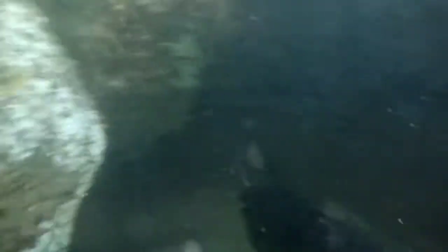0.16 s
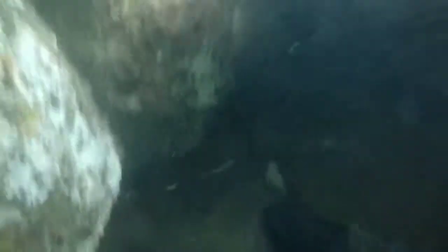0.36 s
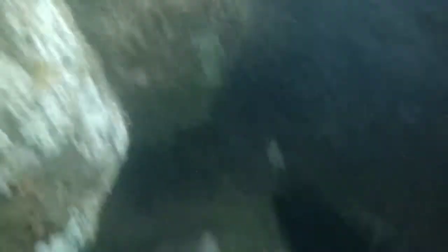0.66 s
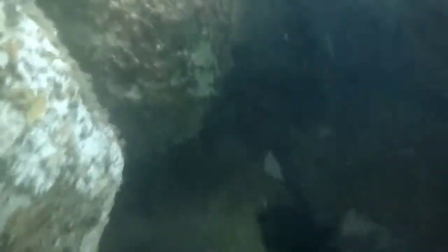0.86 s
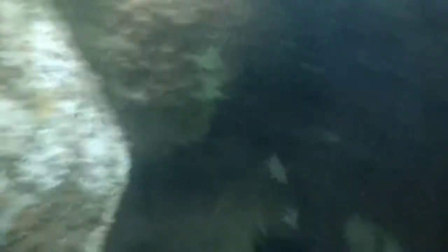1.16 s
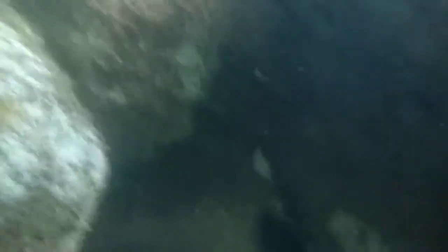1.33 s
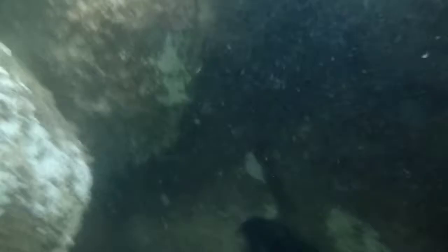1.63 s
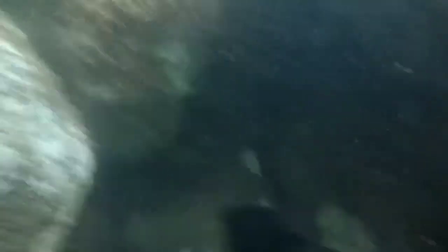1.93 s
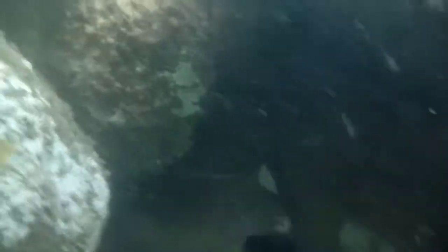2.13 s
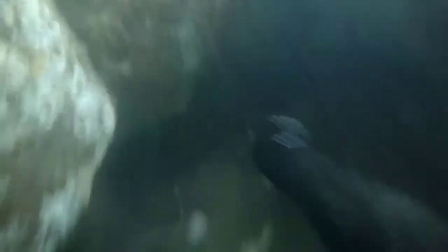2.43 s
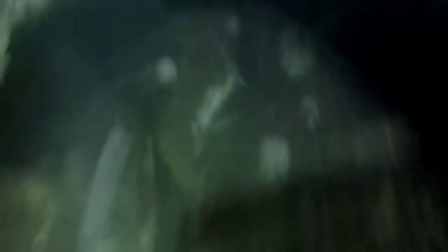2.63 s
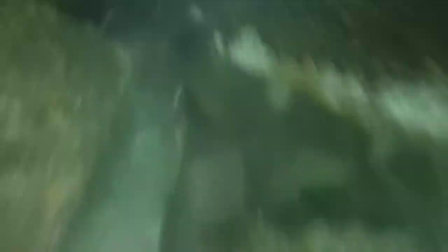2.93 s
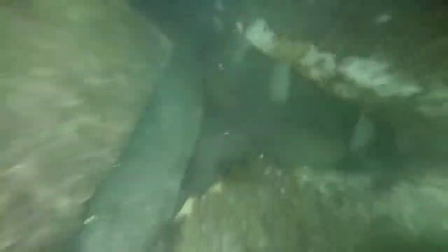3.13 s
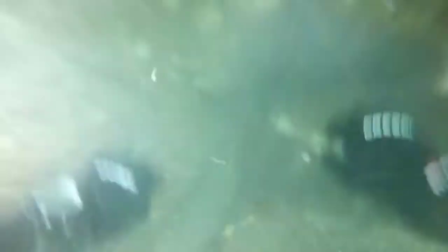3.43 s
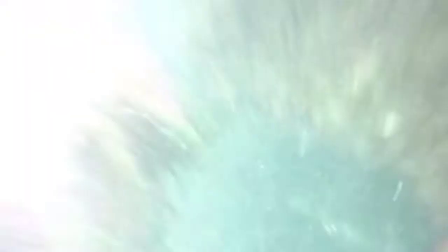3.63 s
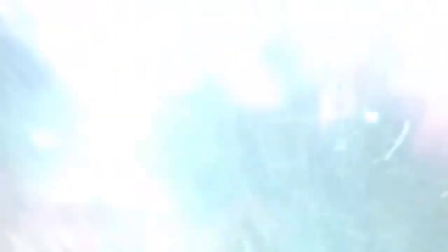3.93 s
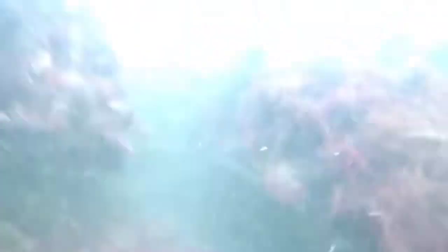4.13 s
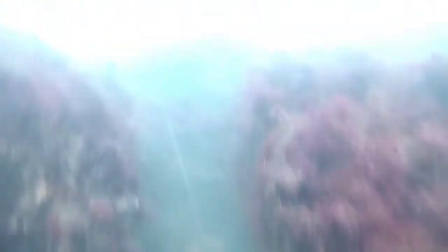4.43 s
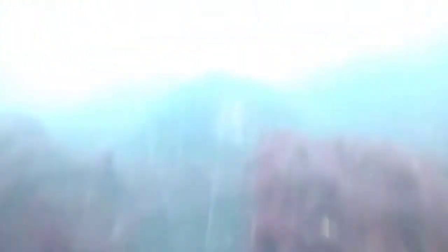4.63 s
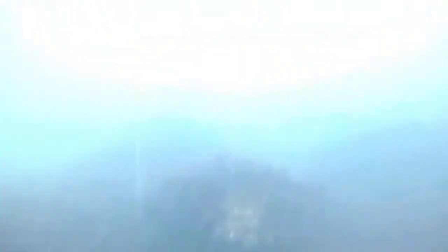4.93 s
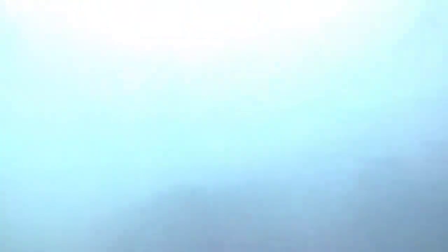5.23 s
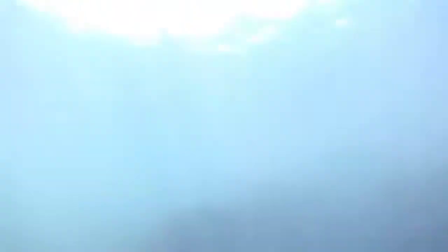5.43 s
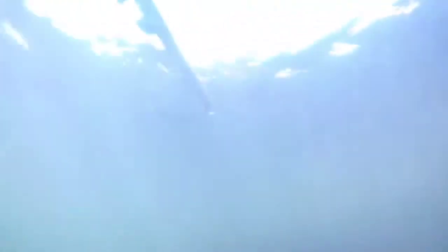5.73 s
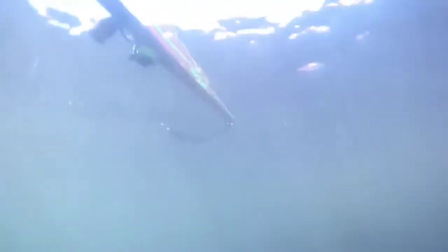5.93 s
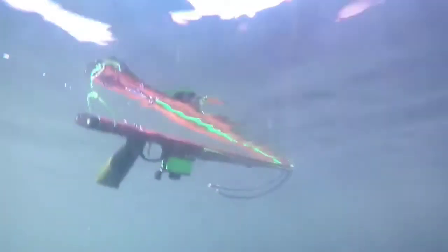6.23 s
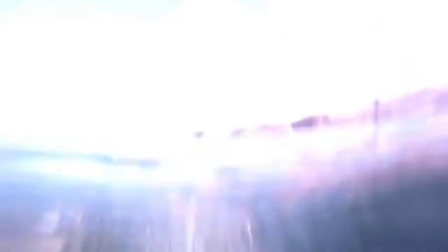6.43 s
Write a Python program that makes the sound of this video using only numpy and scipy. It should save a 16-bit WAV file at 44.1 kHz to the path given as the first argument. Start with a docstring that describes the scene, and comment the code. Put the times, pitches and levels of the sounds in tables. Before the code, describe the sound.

Muffled deep underwater surging and hollow knocks on a sealed camera housing, with gritty rubs and ticks, ending in a gurgle at the surface.

```python
"""Deep surging and sharp knocks, with rubs, ticks and wobbles, end in a gurgle: a camera in a sealed housing
is carried among rocks under water and brought up to the surface. Surge and wash are filtered noise; knocks are
damped sines with cracks; rubs, fizz and swishes are random grit ringing shell modes; wobbles, perhaps trapped
air, are gliding sines; bubbles are short resonances. Two wide channels merge into one after two seconds."""
import sys
import numpy as np
from scipy import signal
from scipy.fft import rfft, irfft
from scipy.io import wavfile
from scipy.ndimage import uniform_filter1d, minimum_filter1d

SR = 44100
rng = np.random.default_rng(int(sys.argv[2]) if len(sys.argv) > 2 else 0)


def log_audio(samples):
    """Write samples as a 16-bit WAV file to the path given in sys.argv[1]."""
    # one column per channel
    frames = np.atleast_2d(samples).T
    # limit to full scale, then quantise
    limited = np.clip(frames, -1, 1)
    pcm = np.round(limited * 32767).astype(np.int16)
    wavfile.write(sys.argv[1], SR, pcm)


N = 289276

# strength of the water surging on the shell: (time [s], level [dB])
SURGE_LEVEL = [(0.0, -19.5), (1.24, -18.5), (1.46, -19.5), (1.64, -28.5), (1.72, -17), (2.25, -20.5),
               (2.32, -24.5), (2.6, -15), (2.66, -21.5), (3.3, -26.5), (3.54, -14), (3.71, -26),
               (4.13, -16), (4.24, -27.5), (4.4, -16.5), (5.33, -19), (6.1, -14.5), (6.2, -21), (6.56, -15)]
# knocks inside the housing: (time [s], ring level [dB], ring pitch [Hz], crack relative to ring [dB])
KNOCK_EVENTS = [(0.015, -7.5, 446, -1), (0.112, -11.5, 476, -4), (0.167, -26.5, 407, 2.5),
                (0.216, -20, 352, -42), (0.308, -8, 371, -15.5), (0.319, -12, 360, -10.5),
                (0.376, -13, 416, -4.5), (0.516, -13, 330, -38), (0.571, -8, 464, -7), (0.64, -13, 411, 5),
                (0.654, -15.5, 510, -22), (0.697, -14.5, 403, -1), (0.774, -9.5, 449, -6.5),
                (0.791, -10.5, 375, -13), (0.848, -11, 402, -9), (0.935, -7.5, 362, -6),
                (1.194, -5.5, 423, -4), (1.298, -8, 484, -4), (1.34, -16.5, 392, 1.5),
                (1.409, -11.5, 375, -17), (1.425, -11, 495, -4.5), (1.441, -7.5, 367, -16),
                (1.485, -15.5, 392, 6), (1.549, -17, 340, -40), (1.675, -19.5, 345, 1),
                (1.748, -8, 346, -11), (1.802, -14.5, 495, 2.5), (1.925, -10, 480, -7),
                (1.96, -20, 409, -8), (2.033, -15.5, 487, -4), (2.049, -10, 530, -48),
                (2.222, -25.5, 523, -29), (2.516, -22, 580, -25), (2.548, -8, 548, -3),
                (2.562, -9.5, 571, 0), (2.605, -6, 406, -5.5), (2.687, -10.5, 510, -34),
                (2.936, -4.5, 530, -8), (3.069, -10, 517, -13), (3.252, -38, 604, -30),
                (3.531, -6, 477, 12.5), (3.969, -9, 569, -6), (3.981, -7, 494, -21), (3.99, -20, 430, -5),
                (4.024, -15, 554, 2.5), (4.083, -4, 528.5, -13), (4.122, -9, 558, -12.5),
                (4.411, -17.5, 550, 0), (4.449, -20.5, 504, -1), (4.521, -8, 519, -33),
                (4.563, -10.5, 395, -3.5), (4.712, -18, 542, -30), (4.796, -10, 398, -11),
                (4.872, -21.5, 532, -0.5), (4.89, -18.5, 438, -30), (4.988, -10, 380, 0.5),
                (5.045, -5, 456, -9.5), (5.236, -9, 473, -14), (5.306, -4.5, 498, -16),
                (5.357, -10.5, 500, -16.5), (5.475, -16, 388, -8), (5.498, -24, 562, 7.5),
                (5.655, -7, 613, 9), (5.874, -18.5, 438, -21), (5.967, 3, 527, -49), (6.048, -23, 450, -32),
                (6.102, 0.5, 355, -22)]
# rubbing strokes on the shell that swell and fade: (time of the peak [s], level [dB])
STROKE_EVENTS = [(0.404, -28.5), (0.458, -26.5), (0.632, -25.5), (0.932, -30.5), (1.146, -25.5),
                 (1.358, -36.5), (1.503, -28.5), (1.695, -35.5), (1.915, -36)]
# air leaving at the surface: (time [s], pockets [dB], bubbles [dB], fizz [dB])
AIR_LEVELS = [(6.0, -53.5, -70, -45.5), (6.11, -11.5, -36, -47.5), (6.2, -12.5, -49, -54),
              (6.56, -20.5, -32.5, -42)]
ESCAPE_S = AIR_LEVELS[0][0]


def amp(db):
    """Decibels to linear gain."""
    return 10 ** (np.asarray(db) / 20)


def rms_one(x):
    """Scale to an rms of 1."""
    return x / np.sqrt(np.mean(x ** 2) + 1e-20)


def in_time(rows):
    """Columns of a table, joined by straight lines, at every sample."""
    s, *columns = np.transpose(rows)
    return [np.interp(np.arange(N) / SR, s, c) for c in columns]


def colour(x, points, turn=1):
    """Shape by a (Hz, dB) spectrum, straight over log frequency; turn rotates the phase."""
    hz, db = np.transpose(points)
    f = np.arange(N // 2 + 1) * SR / N + 1
    gain = amp(np.interp(np.log(f), np.log(hz), db))
    return irfft(rfft(x) * gain * turn, N)


def band(x, low_hz, high_hz):
    """Gentle band-pass."""
    return signal.sosfilt(signal.butter(2, [low_hz, high_hz], "band", fs=SR, output="sos"), x)


def even(x, window_s, share):
    """Take part of the chance swell out of a noise; rms 1."""
    level = np.sqrt(uniform_filter1d(x ** 2, int(window_s * SR)) + 1e-12)
    return rms_one(x / level ** share)


def flicker(rate):
    """Random knots of spread 1, rate per second, joined by lines; the 400th is held to the end."""
    knots = rng.standard_normal(400)
    return np.interp(np.arange(N) / SR * rate, np.arange(400), knots)


def resonance(x, hz, width_hz):
    """One ringing mode: a narrower width rings longer."""
    r = np.exp(-np.pi * width_hz / SR)
    zeros = [(1 - r * r) / 2, 0, (r * r - 1) / 2]
    poles = [1, -2 * r * np.cos(2 * np.pi * hz / SR), r * r]
    return signal.lfilter(zeros, poles, x)


def shell(x, widen, patchy_db, shift=1):
    """The shell's modes in parallel, each swelling and sinking on its own as the contact moves."""
    # modes before shift and widening: (pitch [Hz], width [Hz], mean level [dB])
    modes = [(1400, 750, -2), (2026, 79, 15), (2710, 190, -1), (3410, 710, -5), (3980, 210, -6.5),
             (5590, 610, -8), (6080, 360, -1), (7350, 89, -5.5), (8700, 700, -13.5)]
    out = np.zeros(len(x))
    for k, (hz, width, db) in enumerate(modes):
        gain = amp(db + patchy_db * flicker(45)[:len(x)])
        out += (-1) ** k * gain * resonance(x, hz * shift, widen * width)
    return out


def grit(per_s):
    """Random contacts of uneven size."""
    sizes = rng.standard_normal(N) * amp(2.5 * rng.exponential(1, N).clip(0, 4))
    return (rng.random(N) < per_s / SR) * sizes + 1e-18


def add(out, s, sound):
    """Mix a sound in at a time in seconds."""
    i = max(round(s * SR), 0)
    out[i:i + len(sound)] += sound[:N - i]


def damped(t, hz, t60, glide=0):
    """A dying sine; a bending wave brings its high pitch first."""
    phase = 2 * np.pi * hz * (t + glide * 0.001996 * (1 - np.exp(-t / 0.0046)))
    return np.sin(phase) * amp(-60 * t / t60)


def jolts():
    """How much knocks and strokes shake the housing; mean 0, spread 1."""
    jolt_s = 0.037
    shaken = np.zeros(N)
    for s, *_ in KNOCK_EVENTS + STROKE_EVENTS:
        add(shaken, s - jolt_s / 4, np.hanning(int(jolt_s * SR)))
    shaken = np.tanh(shaken)
    return rms_one(shaken - shaken.mean())


def wash(lumps):
    """Patchy water noise that rises with the surge, a faint hiss, and swishes of fine crackle on the shell."""
    # the wash behind everything: (time [s], middle level [dB], treble hiss level [dB])
    wash_levels = [(0, -56, -71), (2.3, -46.5, -65.5), (3.3, -48, -66), (4.5, -44, -59.5), (5.9, -41, -62),
                   (6.0, -42.5, -68), (6.56, -27.5, -67.5)]
    # tone of the middle: (frequency [Hz], relative density [dB per Hz])
    middle_tone = [(150, -25.5), (280, -4), (400, -10), (760, -12.5), (1000, -34), (1500, -29),
                   (1950, -25.5), (2600, -43), (4500, -78)]
    # tone of the hiss: (frequency [Hz], relative density [dB per Hz])
    hiss_tone = [(1650, -50.5), (2800, -33.5), (3470, -3.5), (8960, -2), (11300, -8), (13000, -36.5)]
    middle_db, hiss_db = in_time(wash_levels)
    stir_db = .4 * (in_time(SURGE_LEVEL)[0] + 20) + 2.5 * lumps + 2.5 * flicker(30)
    middle = rms_one(colour(rng.standard_normal(N), middle_tone)) * amp(middle_db + stir_db)
    hiss = rms_one(colour(rng.standard_normal(N), hiss_tone)) * amp(hiss_db + 2.0 * flicker(30))
    swish = rms_one(band(shell(grit(1100), widen=0.62, patchy_db=11.5), 1000, 7400))
    return middle + hiss + swish * amp(hiss_db - 2.5 + 4.6 * flicker(29))


def hum():
    """A blurred hum from the housing: noise twice through one narrow resonance, for a short stretch."""
    # swell of the hum: (time [s], level [dB])
    hum_level = [(3.2, -47.5), (3.4, -26.5), (3.5, -36), (3.72, -45.5)]
    hz, width_hz = 278.7, 26
    tone = resonance(resonance(rng.standard_normal(N), hz, width_hz), hz, width_hz)
    t = np.arange(N) / SR
    heard = (t > hum_level[0][0]) * (t < hum_level[-1][0])
    return even(tone, 0.041, 0.32) * amp(in_time(hum_level)[0]) * heard


def crackles():
    """Fluttering clusters of small pops, ringing briefly near 2 kHz and at a second pitch."""
    # clusters, perhaps fine bubbles: (time [s], length [s], level [dB], second ring [Hz])
    clusters = [(3.56, 0.024, -46, 1400), (3.59, 0.208, -51, 1400), (5.476, 0.046, -47, 4160),
                (5.635, 0.045, -39.5, 3900), (5.704, 0.048, -47, 3970), (5.916, 0.075, -45, 2500)]
    out = np.zeros(N)
    flutter = amp(7 * flicker(70))
    grains = grit(350) + .15 * grit(3000)
    for s, length, db, hz in clusters:
        n, i = int(length * SR), int(s * SR)
        pops = grains[i:][:n] * np.hanning(n) ** .3 * flutter[i:][:n]
        low = resonance(resonance(pops, 1900, 500), 1900, 800)
        high = resonance(resonance(pops, hz, 430), hz, 1300) + 0.064 * band(pops, 1700, 5600)
        add(out, s, amp(db) * rms_one(low + 0.97 * high))
    return out


def ticks():
    """A very short broad snap on the shell, and a ring on its own pitch."""
    # sharp ticks: (time [s], peak level [dB], centre [Hz])
    snaps = [(1.278, -33, 2700), (1.8076, -26, 2610), (2.4866, -24.5, 2140), (2.5474, -29, 2160),
             (2.558, -27, 2200), (2.563, -23, 5200), (2.602, -27, 2200), (2.623, -34, 4480),
             (2.639, -38, 2300), (2.91, -36, 5960), (3.397, -26.5, 1910), (3.4048, -25, 2500),
             (3.412, -30.5, 4070), (3.5326, -14.5, 5400), (4.5574, -28, 1950), (4.637, -32, 2060),
             (4.984, -22.5, 2510), (5.505, -23, 1250), (5.5597, -20, 3450), (5.56, -24.5, 7050),
             (5.629, -31, 1900), (5.765, -34.5, 4300), (6.546, -32, 3100)]
    out, t = np.zeros(N), np.arange(600) / SR
    for (s, db, hz), noise in zip(snaps, rng.standard_normal((len(snaps), 600))):
        puff = noise * amp(-60 * t / 0.014) * (1 - np.exp(-t / 0.00092))
        tick = resonance(puff, hz, 0.11 * hz) + 0.06 * band(puff, 1200, 6500)
        add(out, s, amp(db) * tick / np.abs(tick).max())
    return out


def wobbles():
    """Near sines with a weak overtone, on gliding pitches that swell and fade, a little unsteady."""
    # perhaps trapped air: (time [s], length [s], start [Hz], middle [Hz], end [Hz], level before waver [dB])
    glides = [(0.692, 0.026, 477, 435, 410, -9.5), (3.333, 0.023, 98, 101.5, 96, -4),
              (4.685, 0.061, 215, 176.5, 176, -0.5), (4.763, 0.11, 230, 283.3, 165, -12.5),
              (4.893, 0.03, 205, 193, 181, -5), (6.105, 0.071, 357, 235, 234, -2),
              (6.182, 0.04, 199, 196, 201, -11.5), (6.32, 0.065, 151, 157.8, 198, -8)]
    out, unsteady, waver = np.zeros(N), flicker(60), flicker(80)
    for s, length, start_hz, middle_hz, end_hz, db in glides:
        u = np.linspace(0, 1, int(length * SR))
        i = int(s * SR)
        # a parabola through the three pitches
        arc = np.polyval(np.polyfit([0, .5, 1], [start_hz, middle_hz, end_hz], 2), u)
        shake = unsteady[i:][:len(u)]
        phase = 2 * np.pi * np.cumsum(arc * (1 + .045 * shake)) / SR
        swell = amp(3 * waver[i:][:len(u)]) * np.tanh(2 * np.sin(np.pi * u) ** 1.5)
        add(out, s, amp(db) * swell * (np.sin(phase) - 0.019 * np.sin(3 * phase)))
    return out


def bubbles(per_s, low_hz, high_hz, cycles):
    """Random births once the air escapes, each ringing a few cycles at one of twelve pitches; rms 1."""
    n = N - int(ESCAPE_S * SR)
    born = (rng.random(n) < per_s / SR) * rng.standard_normal(n) + 1e-18
    dealt = rng.integers(0, 12, n)
    rings = np.zeros(n)
    for k, hz in enumerate(np.geomspace(low_hz, high_hz, 12)):
        # the second pass makes each bubble swell before it dies
        once = resonance(born * (dealt == k), hz, hz / cycles)
        rings += resonance(once, hz, hz / cycles) * cycles / hz
    return np.pad(rms_one(rings), (N - n, 0))


def gurgle():
    """Large air pockets, smaller bubbles and fizz, with a few distinct glugs as damped sines."""
    # distinct bubbles at the surface: (time [s], level before decay [dB], pitch [Hz])
    glugs = [(6.072, -42, 3750), (6.141, -45, 3640), (6.205, -28.5, 1750), (6.224, -11.5, 525),
             (6.275, -20.5, 750), (6.295, -10, 553), (6.355, -16, 652), (6.38, -25.5, 1990),
             (6.399, -13, 653), (6.436, -6, 532), (6.544, -14, 886)]
    pocket_db, bubble_db, fizz_db = in_time(AIR_LEVELS)
    out = amp(pocket_db) * bubbles(300, 124, 391, 4.6)
    out += amp(bubble_db) * bubbles(670, 380, 1176, 11.0)
    fizz = shell(grit(6000), widen=1.3, patchy_db=5, shift=.94)
    fizz = rms_one(band(band(fizz, 1300, 4200), 900, 4600))
    out += amp(fizz_db + 3 * flicker(40)) * fizz
    out += amp(fizz_db - 4.5) * bubbles(250, 1600, 3000, 16.0)
    # silent until the air escapes, then faded in over 0.12 s
    out *= np.clip((np.arange(N) / SR - ESCAPE_S) / 0.12, 0, 1)
    t = np.arange(2000) / SR
    for s, db, hz in glugs:
        add(out, s, amp(db) * damped(t, hz, 0.046) * (1 - np.exp(-t / 0.00069)))
    return out


def rubs():
    """Grit under each stroke excites the shell's modes, a little shifted each time; the low mode lingers."""
    # scuffs that start at once and trail off: (time of the peak [s], level [dB], fall [s])
    scuffs = [(0.008, -32.5, 0.18), (0.965, -38, 0.026), (1.035, -20.5, 0.044), (1.106, -29, 0.14),
              (2.148, -45.5, 0.22), (4.329, -40.5, 0.13)]
    stroke_rise_s, stroke_fall_s, scuff_rise_s = 0.068, 0.059, 0.0062
    out = np.zeros(N)
    gritty = grit(2800) * amp(4 * flicker(90))
    rows = [(s, db, stroke_rise_s, stroke_fall_s) for s, db in STROKE_EVENTS]
    rows += [(s, db, scuff_rise_s, fall) for s, db, fall in scuffs]

    def layer(x, low_hz, high_hz):
        """A twice-filtered, slightly evened band of the rub."""
        return even(band(band(x, low_hz, high_hz), low_hz, high_hz), 0.094, 0.1)

    for (s, db, rise, fall), luck in zip(rows, rng.standard_normal(len(rows))):
        start = max(s - rise, 0)
        t = start + np.arange(int((s + fall - start) * SR)) / SR
        grains = gritty[int(start * SR):][:len(t)]
        body = shell(grains, widen=1, patchy_db=5.5, shift=amp(.2 * luck))
        drag = layer(grains, 250, 900)
        low = layer(body, 1250, 2500)
        high = layer(body, 2100, 10500)
        pressure = np.interp(t, [s - rise, s, s + fall], [0, 1, 0])
        # the steeper power makes the treble fade sooner
        rub = pressure ** 3.55 * (low + amp(-6.5) * drag) + amp(-1.5) * pressure ** 5.34 * high
        add(out, start, amp(db) * rub)
    return out


def surge(lumps):
    """Two layers of low noise that come in lumps together, the upper one more so."""
    deep = even(band(rng.standard_normal(N), 19.7, 78.2), 0.1, 1.0) * amp(3 * lumps)
    upper = rms_one(band(band(rng.standard_normal(N), 71, 234), 37, 192)) * amp(5 * lumps)
    return amp(in_time(SURGE_LEVEL)[0]) * (amp(-1.0) * deep + amp(-13.0) * upper)


def knocks():
    """Each blow shoves the housing, rings it and, if hard, cracks; higher modes die sooner."""
    # overtones before random spread: (ratio to the ring [1], level [dB], t60 [s])
    overtones = [(0.746, -2.5, 0.029), (0.999, 1, 0.029), (1.499, -12.5, 0.023), (1.956, -12, 0.014)]
    out, t = np.zeros(N), np.arange(int(.12 * SR)) / SR
    for (s, db, hz, hard_db), luck in zip(KNOCK_EVENTS, rng.standard_normal((len(KNOCK_EVENTS), 8))):
        blow = np.zeros(len(t))
        for (ratio, o_db, t60), u in zip(overtones, luck):
            blow += amp(o_db + 2 * u) * damped(t, hz * ratio, t60 * amp(2.3 * u), glide=0.8)
        blow *= 1 - np.exp(-(t / 0.0023) ** 2)
        blow /= np.abs(blow).max()
        crack = damped(t, 1714, 0.012, glide=0.21) + 0.58 * damped(t, 1281, 0.012, glide=1.7)
        crack += 0.14 * band(rng.standard_normal(len(t)), 670, 4000) * amp(-60 * t / 0.023)
        blow += amp(hard_db) * crack * (1 - np.exp(-(t / 0.0012) ** 2))
        add(out, s - .001, amp(db) * blow)
        # a faint rebound
        add(out, s + 0.017 * amp(2.5 * luck[5]), -amp(db - 22.5 + 5.8 * luck[6]) * blow)
        # a low shove that starts at once, about 4 ms ahead of the ring
        shove = damped(t, 65 * amp(4.2 * luck[7]), 0.13) * (1 - np.exp(-t / 0.000088))
        add(out, s - .005, -amp(0.88 * db - 4 + 3 * luck[4]) * shove)
    return out


def two_capsules(mid):
    """Two capsules apart on the shell hear it out of phase, by an angle that wanders; the width then fades."""
    # tone of the side signal: (frequency [Hz], side relative to mid before widening [dB])
    side_tone = [(60, -24), (180, -13), (550, -3.5), (1650, -1), (4970, -2.5)]
    wide_db, merge_s, merge_db_per_s = 3, 1.77, 30.5
    angle = 1.8 + .8 * flicker(22)   # radians
    side = np.cos(angle) * colour(mid, side_tone) + np.sin(angle) * colour(mid, side_tone, turn=1j)
    side *= amp(wide_db - merge_db_per_s * np.maximum(np.arange(N) / SR - merge_s, 0))
    return np.array([mid + side, mid - side])


def scene():
    """All layers in one signal, then spread over two channels; jolts stir the water around the shell."""
    lumps = 1.336 * flicker(16) + 0.88 * jolts()
    mid = surge(lumps) + knocks() + rubs() + crackles() + ticks() + wobbles()
    mid += hum() + gurgle() + wash(lumps)
    return two_capsules(mid)


def record(dry):
    """A limiter ducks both channels smoothly around the highest peaks; the top is cut."""
    cutoff_hz, span = 14800, SR // 100   # span of 10 ms in samples
    needed = np.minimum(.97 / np.abs(dry + 1e-9).max(axis=0), 1)
    gain = uniform_filter1d(minimum_filter1d(needed, span), span)
    return signal.sosfilt(signal.cheby2(10, 60, cutoff_hz, fs=SR, output="sos"), gain * dry)


dry = scene()
out = record(dry)
log_audio(out)
```